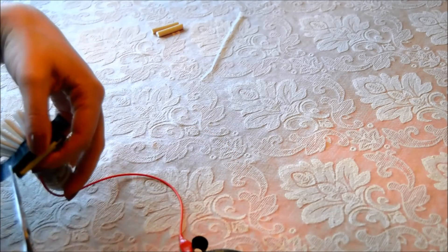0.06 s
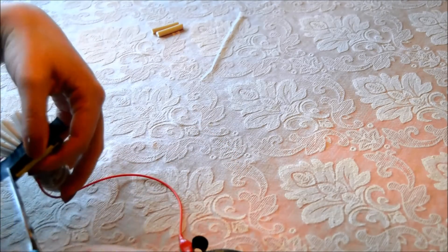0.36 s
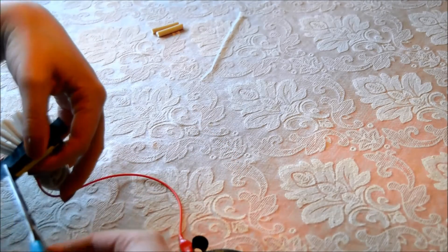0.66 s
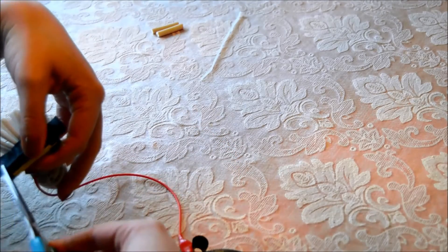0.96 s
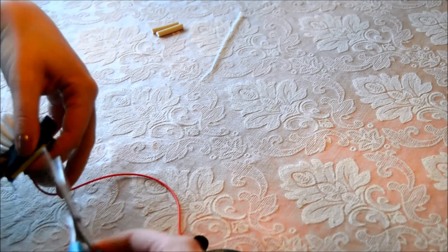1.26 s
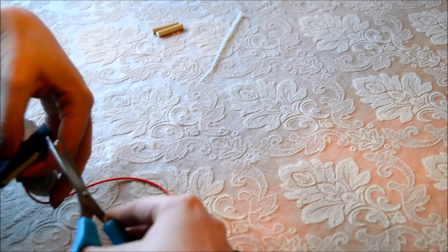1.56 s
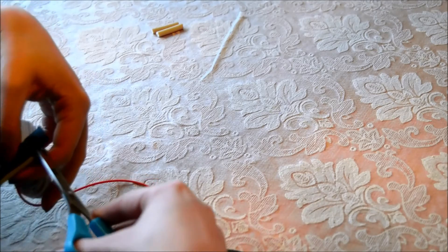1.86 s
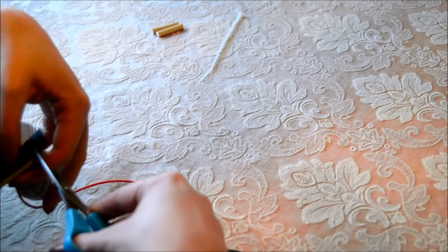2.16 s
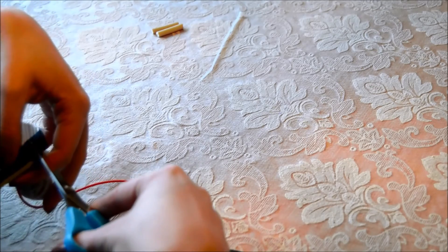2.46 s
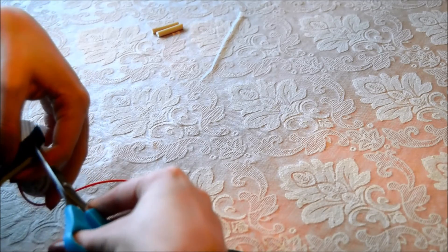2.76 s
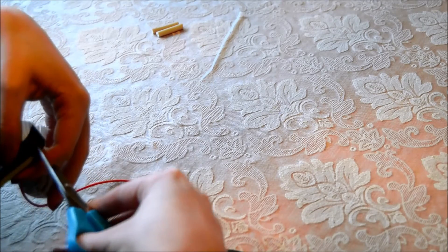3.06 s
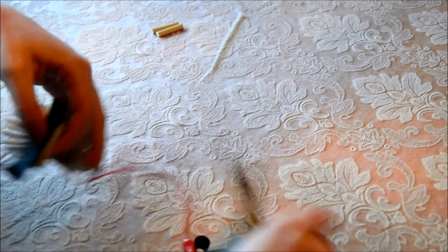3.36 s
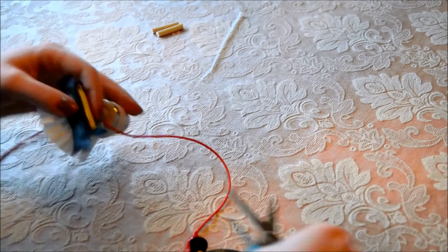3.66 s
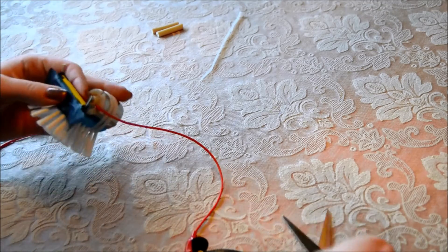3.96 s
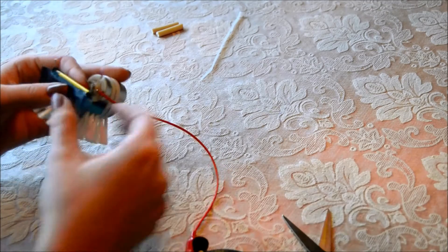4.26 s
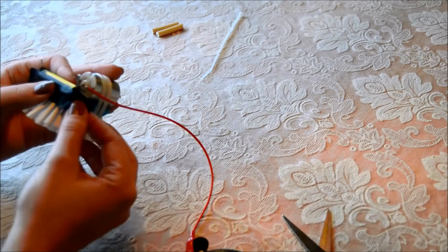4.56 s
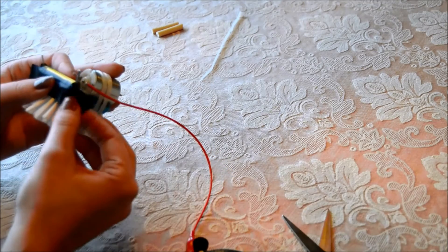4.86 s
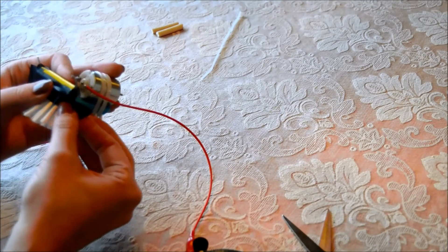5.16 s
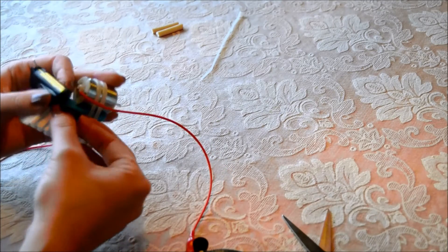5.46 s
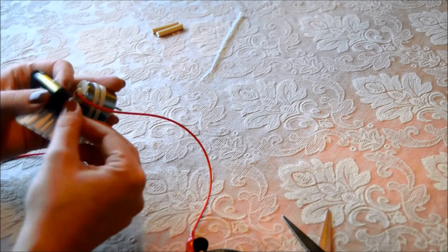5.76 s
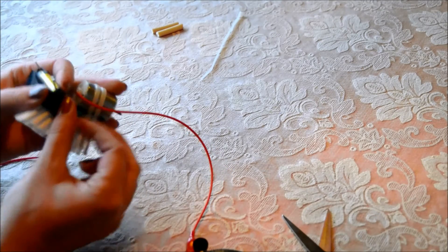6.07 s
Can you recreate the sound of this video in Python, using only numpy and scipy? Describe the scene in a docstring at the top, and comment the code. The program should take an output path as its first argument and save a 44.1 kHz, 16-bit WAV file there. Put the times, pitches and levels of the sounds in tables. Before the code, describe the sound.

Close up in a quiet room, scissors trim tape on a small plastic part, giving a quick cluster of sharp snaps and then one more, with tiny scrapes and ticks between. The scissors drop onto a cloth-covered table with a loud knock and a brief rattle of blades. Fingers then press the sticky tape down with faint crackles, ending on a small click.

```python
"""Over the steady hush of a quiet room, scissors trim the tape on a small hand-held assembly, up close.
Blades and plastic parts snap near 1 s and again near 3 s, among small scrapes and ticks.
At 3.9 s the scissors drop on a cloth-covered table: the top knocks loudly and the loose blades rattle.
From 4.3 s fingers press the sticky tape down with faint crackles, and one last click comes at 6 s."""
import sys
import numpy as np
from scipy import signal
from scipy.fft import rfft, irfft
from scipy.io import wavfile

SR = 44100
rng = np.random.default_rng(int(sys.argv[2]) if len(sys.argv) > 2 else 0)


def unload_audio(sound):
    """Save the sound as a 16-bit wav file, at the path given as the first command line argument."""
    columns = np.transpose(np.atleast_2d(sound))
    # keep every value between -1 and 1, then stretch to whole-number steps
    steps = np.round(np.clip(columns, -1, 1) * 32767)
    wavfile.write(sys.argv[1], SR, steps.astype(np.int16))


N = 269892
T = np.arange(int(.7 * SR)) / SR  # time axis of one hit [s]
TOP_HZ = 11000

# The drop and its bounces: (time [s], table level [dB], blade level [dB])
BOUNCES = [(3.8960, -1, 1.5), (3.9140, -10, -20), (3.9310, -16, -10.5), (3.9637, -27, -15.5)]
# Thud of the scissors on the cloth: (frequency [Hz], relative level [dB])
THUD_EQ = [(100, -42), (300, -3), (900, -4), (2000, -8), (3500, -6), (6000, -54)]
# Dense wash behind the knock: (frequency [Hz], relative level [dB])
WASH_EQ = [(80, -56), (135, -15), (230, -13), (340, -2.5), (470, -5), (560, 4.5), (780, -1.5), (1100, -0.5),
           (1450, -7), (2150, -3), (3000, -13), (4200, -28), (6000, -32.5), (9000, -30), (11000, -31)]
# Ring of the table top: (frequency [Hz], relative level [dB], t60 [s])
TABLE_TOP_MODES = [(167, -15, .5), (322, -13, .35), (372, -11, .35), (410, -11, .4), (559, 1, .3),
                   (591, -3, .35), (647, -4, .33), (742, -8, .3), (872, -9, .35), (970, -10, .32),
                   (1037, -7, .3), (1077, -5, .28), (1106, -8, .28), (1182, -5, .35), (1278, -12, .4),
                   (1417, -13, .3), (1808, -11, .3), (2048, -9, .3), (2169, -9, .3), (2223, -10, .22),
                   (2415, -14, .32)]
def table_knock(thud_db=-6, wash_db=-22.5, wash_t60=0.4, wash_lag_s=0.00099,
                ring_db=-30.5, cloth_hz=2900):
    """Each landing pushes the table top, whose modes ring on in a dense wash."""
    out = np.zeros(N)
    thud = colour(1. * (T == 0), THUD_EQ)
    for s, db, _ in BOUNCES:
        add(out, s, undb(db + thud_db) * thud)
        add(out, s + wash_lag_s, undb(db + wash_db) * burst(WASH_EQ, wash_t60))
    # the first, hardest blow starts all modes at full speed; the cloth rounds the attack
    modes = sum(undb(db) * ring(hz, t60, np.pi / 2) for hz, db, t60 in TABLE_TOP_MODES)
    cloth = signal.butter(2, cloth_hz, fs=SR, output="sos")
    add(out, BOUNCES[0][0], undb(ring_db) * signal.sosfilt(cloth, modes))
    return out


# Short, bright ring of the blades: (frequency [Hz], relative level [dB], t60 [s])
STEEL_MODES = [(5130, -14, 0.055), (6940, -2, 0.02), (7100, 0, 0.018), (8300, -5.5, 0.023),
               (9080, -5.5, 0.026), (10060, -8, 0.013)]
def blade_rattle(ring_db=-29, clash_db=-31, clash_t60=0.015, lag_s=.0012):
    """Just after each landing the loose steel blades clash together."""
    out = np.zeros(N)
    steel = undb(ring_db) * sum(undb(db) * ring(hz, t60) for hz, db, t60 in STEEL_MODES)
    for s, _, db in BOUNCES:
        clash = undb(clash_db) * burst(CRACKLE_EQ, clash_t60)
        add(out, s + lag_s, undb(db) * (steel + clash))
    return out


# Snaps of scissors and plastic: (time [s], level [dB], body pitch [Hz], body level [dB])
SNAP_CUES = [(0.9461, -20.5, 4250, 3), (1.0376, -35, 4000, -3), (1.065, -39.5, 3000, 9),
             (1.1293, -29, 9300, 16), (1.1302, -23.5, 2200, 6), (2.9467, -20, 4100, 0),
             (6.0179, -30, 5770, 5.5)]
# Ping of a snap: (frequency [Hz], relative level [dB])
PING_MODES = [(3400, -0.5), (5700, 5), (6450, 4.5), (8350, 2.5), (9800, 2)]
# Crack of a snap: (frequency [Hz], relative level [dB])
CRACK_EQ = [(400, -13), (1300, -9.5), (2600, 3), (4200, -1.5), (5700, 5), (7800, 0), (11000, 1)]
def snips(t60=0.0063, crack_db=-8.5, ping_db=-16, body_db=-4,
          send_db=-3, spill_db=5, bright_hz=4940, bright_db_per_octave=-27):
    """The hand damps each snap to a crack, a ping of a few milliseconds and a plastic thock."""
    out = np.zeros(N)
    ping = sum(undb(db + ping_db) * ring(hz, t60) * (-1) ** k for k, (hz, db) in enumerate(PING_MODES))
    for s, db, body_hz, thock_db in SNAP_CUES:
        thock = undb(thock_db) * plastic_body(body_hz)
        direct = ping + undb(crack_db) * burst(CRACK_EQ, t60) + undb(body_db) * thock
        # the body radiates mostly away into the room, less so when it rings above bright_hz
        body_send_db = spill_db + bright_db_per_octave * max(np.log2(body_hz / bright_hz), 0)
        tail = undb(send_db) * room(direct) + undb(body_send_db) * room(thock)
        add(out, s, undb(db) * (direct + tail))
    return out


# Hump of the plastic thock: (frequency [multiple of centre], relative level [dB])
THOCK_EQ = [(.1, -40), (.5, -19), (.8, -3), (1, 0), (1.3, -4), (2, -21), (4, -32)]
def plastic_body(centre_hz):
    """A click through a broad, heavily damped resonance."""
    return colour(1. * (T == 0), [(ratio * centre_hz, db) for ratio, db in THOCK_EQ])


# Featured ticks of tape and wire: (time [s], level [dB])
TICK_CUES = [(.114, -47.5), (1.0445, -44), (1.9575, -45), (1.998, -51.5), (3.1157, -43), (3.1323, -46),
             (4.5152, -46.5), (4.8314, -47.5), (5.9733, -43)]
# Short scrapes against the tape: (time [s], length [s], level [dB])
SCRAPE_CUES = [(0.099, 0.038, -74), (1.11, 0.0258, -53.5), (1.373, 0.052, -73), (1.903, 0.017, -66),
               (3.085, 0.033, -57), (5.975, 0.021, -55.5)]
# Fingers stroking the tape down: (time [s], length [s], level [dB])
STROKE_CUES = [(4.499, 0.058, -73.5), (4.718, 0.079, -78), (4.839, 0.055, -75), (5.025, 0.038, -68),
               (5.347, .14, -71), (5.54, 0.041, -67.5), (5.943, .05, -71.5)]
# Crisp tone of the tape, shared with the blade clash: (frequency [Hz], relative level [dB])
CRACKLE_EQ = [(300, -15), (1500, 6), (3500, -6), (6000, 0), (8500, -2), (11000, -2)]
def tape(tick_t60=0.0061, tick_db=-5, stroke_db=-1, ease_s=.02, hold_from_s=4.3, hold_db=-84):
    """Sticky tape lets go in single ticks, and in swarms of tiny slips when it is rubbed."""
    ticks = list(TICK_CUES) + scatter(0, N / SR, per_s=2, db=-62)  # stray handling ticks
    rubs = list(SCRAPE_CUES)
    for s, length, db in STROKE_CUES:
        ticks += scatter(s, length, per_s=24, db=db + 21)  # each stroke pulls ticks loose
        rubs.append((s - ease_s, length + 2 * ease_s, db + stroke_db))
    rustle = np.zeros(N)
    for s, length, db in rubs:
        swarm = slips(length, per_s=3000)
        swell = np.hanning(len(swarm)) ** 0.91
        add(rustle, s, undb(db) * swarm * swell)
    # held under the fingers, the tape rustles faintly to the end
    add(rustle, hold_from_s, undb(hold_db) * slips(N / SR - hold_from_s, per_s=1050))
    tick_envelope = np.zeros(N)
    for s, db in ticks:
        add(tick_envelope, s, undb(db + tick_db) * fade(tick_t60))
    return colour(rustle + tick_envelope * rng.standard_normal(N), CRACKLE_EQ)


def slips(length, per_s, low_hz=3000, high_hz=11500, spread_db=3.5, t60=0.0042):
    """A swarm of tiny slips, each a brief ring at its own pitch; rms 1."""
    out = np.zeros(int(length * SR))
    t = T[:int(SR / 200)]  # 5 ms grains
    decay = fade(t60)[:len(t)]
    for when, pitch, size in rng.random((2000, 3))[:int(length * per_s) + 1]:
        hz = low_hz + pitch * (high_hz - low_hz)
        gain = undb(-spread_db * np.log(size + .02))
        add(out, when * length, gain * np.sin(2 * np.pi * hz * t) * decay)
    return unit(out + 1e-12)


def scatter(start, length, per_s, db, spread_db=3):
    """Random tick cues within a stretch: (time [s], level [dB])."""
    draws = rng.random((64, 2))[:int(length * per_s)]
    return [(start + when * length, db + spread_db * (2 * size - 1)) for when, size in draws]


# Warm tone of the reverb: (frequency [Hz], relative level [dB])
REVERB_EQ = [(200, 8.5), (1000, 11), (2500, -1.5), (5300, 2.5), (7500, -3), (10500, -0.5)]
def room(x, late_db=-40, late_t60=0.38, early_db=-35, early_t60=0.036, predelay_s=.0025):
    """Early reflections off table and hands, then a small room's tail; each call has its own paths."""
    late = undb(late_db) * burst(REVERB_EQ, late_t60)
    early = undb(early_db) * burst(REVERB_EQ, early_t60)
    response = np.zeros(len(T))
    add(response, predelay_s, late + early)
    return signal.fftconvolve(x, response)[:len(x)]


# Soft bed of room tone: (frequency [Hz], relative level [dB])
HUSH_EQ = [(15, -59), (25, -20.5), (223, -3.5), (281, -3), (311, -2), (588, -2), (685, -3), (1030, -5),
           (1110, -6), (2000, -10), (3410, -16), (3680, -16), (7900, -29.5), (8750, -30), (11000, -37.5),
           (14300, -76), (22000, -120)]
def hush(level_db=-61.5):
    """Steady room air and microphone hiss."""
    return undb(level_db) * unit(colour(rng.standard_normal(N), HUSH_EQ))


def undb(db):
    """Decibels to gain."""
    return 10 ** (np.asarray(db) / 20)


def unit(x):
    """Scale to rms 1."""
    return x / np.sqrt(np.mean(x ** 2))


def fade(t60):
    """Exponential decay, 60 dB down after t60 seconds."""
    return np.exp(-np.log(1000) * T / t60)


def add(out, s, x):
    """Mix x into out from time s."""
    i = max(int(s * SR), 0)
    out[i:i + len(x)] += x[:max(len(out) - i, 0)]


def ring(hz, t60, phase=0):
    """One struck mode."""
    return np.sin(2 * np.pi * hz * T + phase) * fade(t60)


def burst(eq, t60):
    """Coloured noise dying away: many modes too close to tell apart."""
    return colour(rng.standard_normal(len(T)) * fade(t60), eq)


def colour(x, eq):
    """Causal EQ through (Hz, dB) points, rolled off at TOP_HZ; keeps the power of white noise."""
    size = 4096
    hz, db = np.transpose(eq)
    f = np.maximum(np.arange(size // 2 + 1) * SR / size, 1)
    curve = undb(np.interp(np.log(f), np.log(hz), db))
    gain = unit(curve / (1 + (f / TOP_HZ) ** 20) + 1e-6)
    # folding the cepstrum gives minimum phase, so attacks stay sharp
    cepstrum = irfft(np.log(gain))
    cepstrum[1:size // 2] *= 2
    cepstrum[size // 2 + 1:] = 0
    response = irfft(np.exp(rfft(cepstrum)))
    return signal.fftconvolve(x, response)[:len(x)]


def scene(send_db=1.0, low_cut_hz=122):
    """Close handling sounds with their room, the table knock and the hush, in mono."""
    close = tape() + blade_rattle()
    foley = snips() + close + undb(send_db) * room(close) + table_knock()
    # the deep bass below about 120 Hz is cut away
    low_cut = signal.butter(4, low_cut_hz, "highpass", fs=SR, output="sos")
    return (signal.sosfilt(low_cut, foley) + hush())[None]


def record(dry):
    """A steep high cut takes the top off the mix."""
    return signal.sosfilt(signal.ellip(8, .3, 70, TOP_HZ, fs=SR, output="sos"), dry)


dry = scene()
out = record(dry)
unload_audio(out)
```